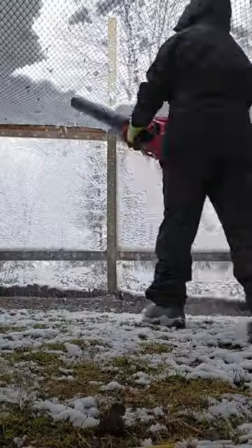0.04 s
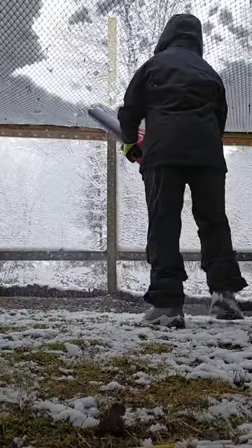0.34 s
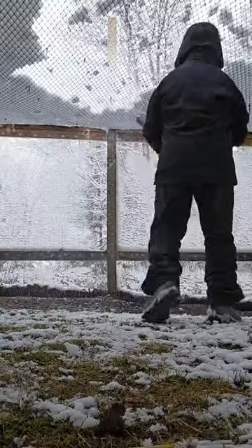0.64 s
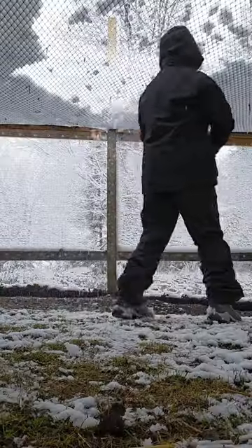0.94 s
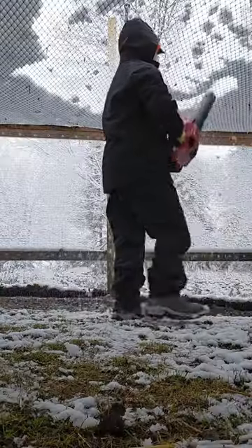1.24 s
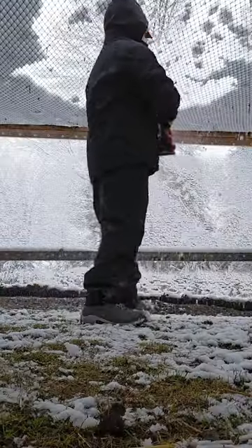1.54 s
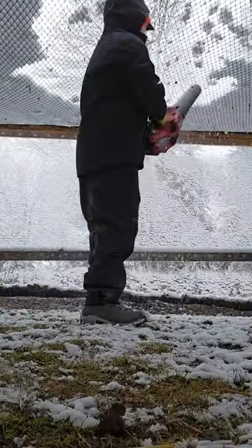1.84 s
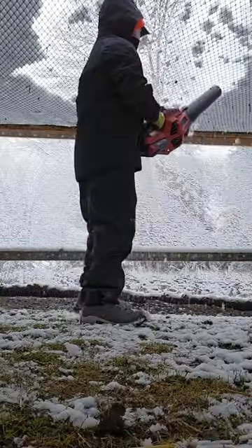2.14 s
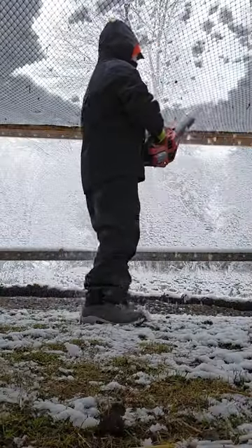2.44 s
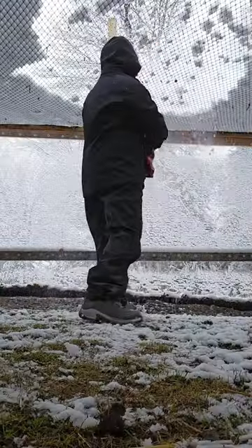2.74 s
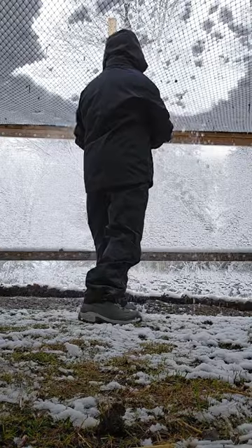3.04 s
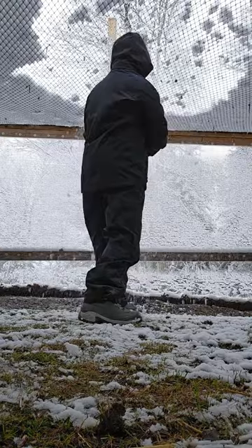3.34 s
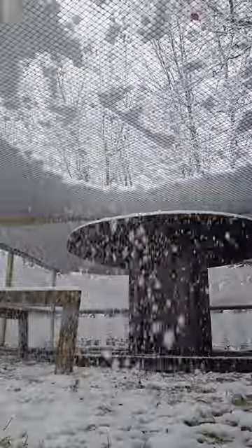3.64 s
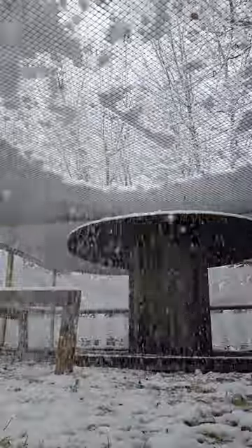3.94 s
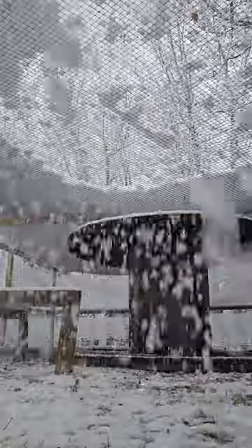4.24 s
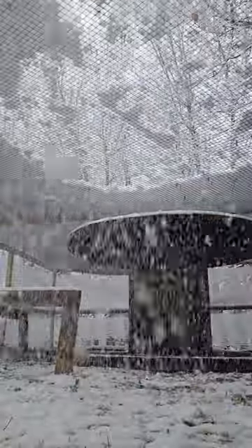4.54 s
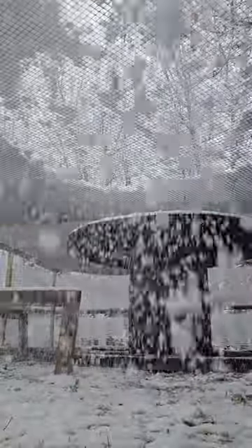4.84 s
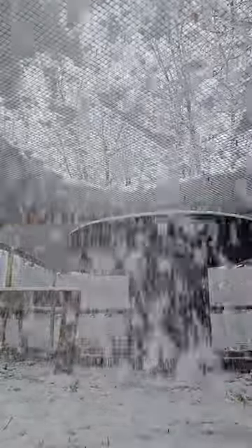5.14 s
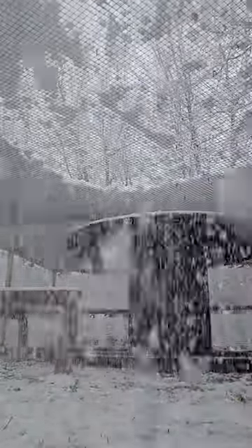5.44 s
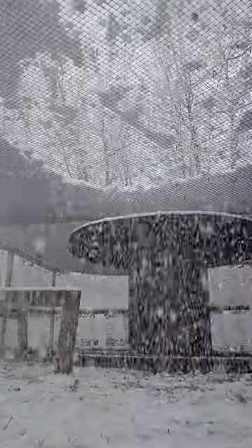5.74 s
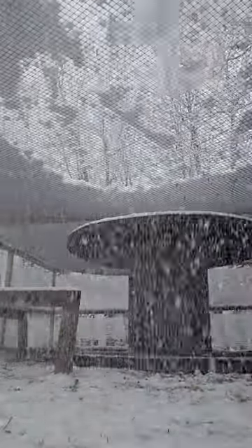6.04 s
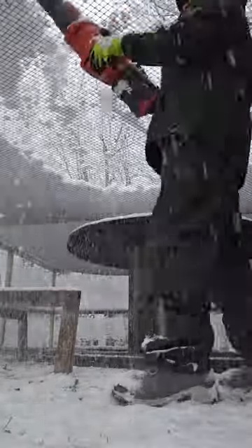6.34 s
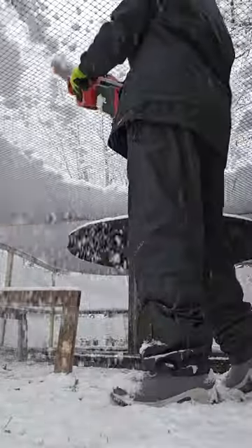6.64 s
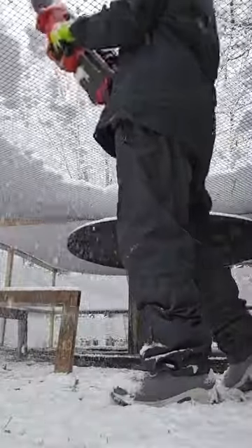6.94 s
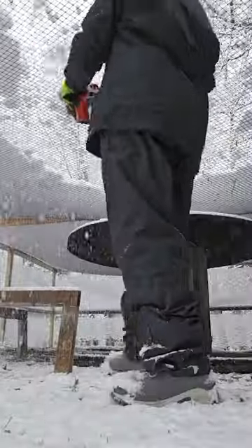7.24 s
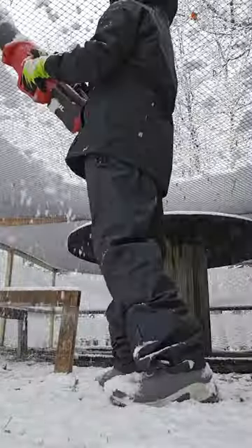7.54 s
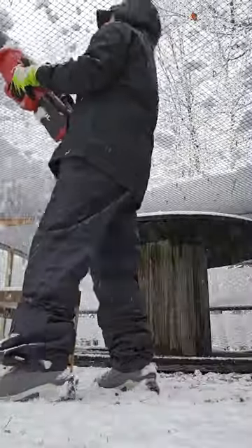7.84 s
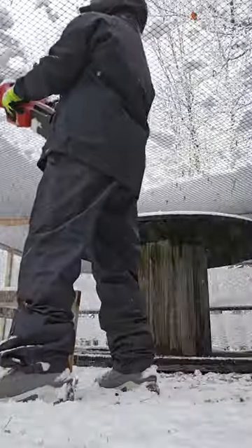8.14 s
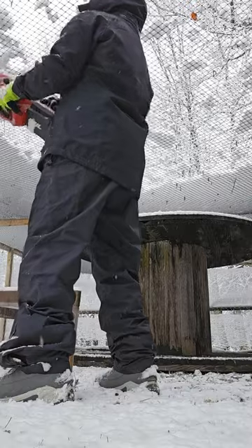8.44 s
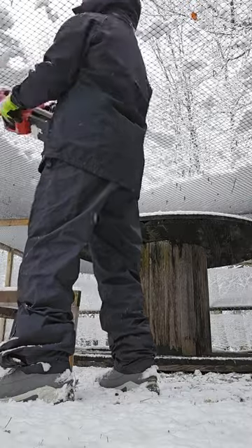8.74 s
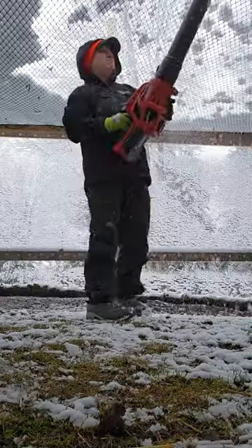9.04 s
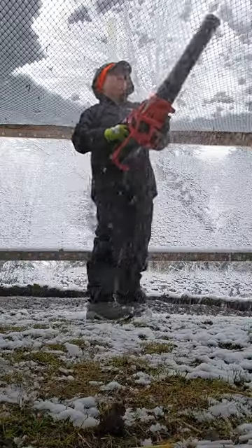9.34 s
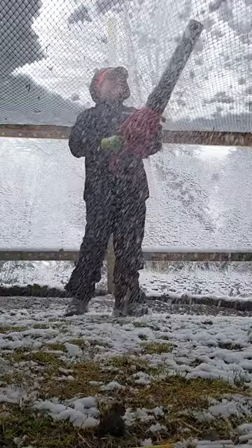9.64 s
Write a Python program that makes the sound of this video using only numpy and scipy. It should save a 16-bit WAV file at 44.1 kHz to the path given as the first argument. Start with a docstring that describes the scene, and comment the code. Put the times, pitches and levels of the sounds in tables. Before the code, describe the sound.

Air rushes and hisses without a break from an electric leaf blower, with a thin, slightly wavering motor whine on top. It starts ahead of the microphone, the hiss surging with each sweep, then jumps to the left, where some snow drops off outdoor netting in muffled puffs. The blower becomes closer and louder there, its whine more prominent, before suddenly sounding thinner and in front again near the end.

```python
"""Leaf blower clearing snow

A cordless blower at full speed blows snow off the netting over an outdoor pen, heard from several
places in turn. Air roars through the tube's resonances and hisses at the nozzle, swelling as it
swings. The fan sings a blade tone with overtones, the motor whines, clumps of snow thud down nearby."""
import sys
import numpy as np
from scipy import signal
from scipy.fft import rfft, irfft, next_fast_len
from scipy.io import wavfile

SR = 44100
rng = np.random.default_rng(int(sys.argv[2]) if len(sys.argv) > 2 else 0)


def unload_wav(signal):
    """Save mono or channel-first audio to the path in sys.argv[1] as 16-bit WAV at rate SR, clipped to [-1, 1]."""
    wavfile.write(
        sys.argv[1],
        SR,
        np.round(np.clip(np.atleast_2d(signal).T, -1, 1) * 32767).astype(np.int16),
    )


N = 432161
TIME = np.arange(N) / SR
CUTOFF_HZ = 16100

# stretch heard from each place: (start [s], end [s])
STRETCHES = [(0, 0.1), (0.1, 3.426), (3.426, 5.375), (5.375, 6.211), (6.211, 8.931), (8.931, 9.8)]
# resting air level per stretch, six zones: (rumble, tube hum, tube roar, intake rush, hiss, spray) [dB]
AIR_REST_DB = [(-34, -34, -36.5, -34, -21.5, -31.5), (-43.5, -37.5, -39, -31, -35.5, -40.5),
               (-41, -48.5, -43.5, -40, -29.5, -37), (-30.5, -35.5, -31.5, -29, -16.5, -30),
               (-36, -35, -31, -32, -22, -36), (-43.5, -44, -43.5, -41, -26, -31)]
# nozzle sweeps towards the listener: (middle [s], length [s], ramp [s], hiss [dB], spray [dB])
NOZZLE_SWEEPS = [(0.13, 0.57, 1, 11.5, 21), (1.29, 0.4, 0.26, 8, 13.5), (2.19, 1.02, 0.7, 12, 20),
                 (3.47, 0.063, 0.06, 2.5, 0), (3.91, 0.48, 0.08, 9, 9), (4.42, 0.11, 0.12, 4.5, 7),
                 (4.93, 0.18, 0.15, 7.5, 8.5), (9.1, 0.39, 0.43, 3, 5)]


def from_db(db):
    """Decibels to gain."""
    return 10 ** (np.asarray(db) / 20)


def rms(x):
    """Root mean square."""
    return np.sqrt(np.mean(x ** 2) + 1e-20)


def in_time(rows, t):
    """Table columns interpolated at times t."""
    times, *columns = np.transpose(rows)
    return np.array([np.interp(t, times, column) for column in columns])


def at_hz(rows, hz):
    """Table columns interpolated over log frequency."""
    knots_hz, *columns = np.transpose(rows)
    return np.array([np.interp(np.log(hz), np.log(knots_hz), column) for column in columns])


def drift(rate_hz, t):
    """Low-passed noise of unit RMS at times t."""
    hop = 40
    pole = np.exp(-2 * hop * np.pi * rate_hz / SR)
    noise = rng.standard_normal(N // hop + 2002)
    slow = signal.lfilter([1], [1, -2 * pole, pole * pole], noise)[2000:]
    return np.interp(t * SR / hop, np.arange(len(slow)), slow / rms(slow))


def swells(rows, t, ramp_s=None):
    """Sum of eased bumps centred within t, per height column; without ramp_s, rows give their ramp."""
    total = 0
    for middle, length, *rest in rows:
        ramp, *heights = rest if ramp_s is None else [ramp_s, *rest]
        share = np.clip(.5 + (length / 2 - np.abs(t - middle)) / ramp, 0, 1)
        share *= t[0] <= middle <= t[-1]
        total = total + np.outer(heights, np.sin(np.pi / 2 * share) ** 2)
    return total


def phase_ahead(hz):
    """Blower ahead: wall echoes turn the phase between the ears."""
    # (frequency [Hz], left lead [rad])
    left_lead = [(680, 0), (1100, 2.9), (1800, 2.4), (2000, .5), (2400, .6), (2700, 3.14), (3700, 3.14),
                 (5500, 4.9), (16000, 9)]
    return at_hz(left_lead, hz)[0]


def phase_side(hz, lag_s=0.0005596, onset_hz=540):
    """Blower to the left: the right channel lags; the low rumble stays centred."""
    return 2 * np.pi * hz * lag_s * hz ** 4 / (hz ** 4 + onset_hz ** 4)


def stereo_noise(hz, size, lead, coherence):
    """Partly coherent white noise spectra at the two ears, left leading."""
    left, independent = rfft(rng.standard_normal((2, size)))
    alike = np.clip(at_hz(coherence, hz)[0], 0, 1)
    right = alike * left + np.sqrt(1 - alike ** 2) * independent
    return np.array([left, right * np.exp(-1j * lead(hz))])


def snow(attack_s=0.0014):
    """Each clump lands as a soft, dull puff."""
    # (time [s], peak [dB], band reference [Hz], decay [s])
    clumps = [(4.085, -24, 220, .02), (4.112, -15, 210, .008), (4.125, -29, 55, .02), (5.125, -32, 60, .03),
              (5.57, -23, 55, .025)]
    out, age = np.zeros(N), np.arange(SR // 2) / SR
    for start_s, peak_db, hz, decay_s in clumps:
        burst = rng.standard_normal(len(age)) * (1 - np.exp(-age / attack_s)) * np.exp(-age / decay_s)
        band = signal.butter(2, [hz / 1.6, hz * 1.07], "band", fs=SR, output="sos")
        puff = signal.sosfilt(band, burst)
        out[round(start_s * SR):][:len(age)] += from_db(peak_db) * puff / np.abs(puff).max()
    return out


def wall_echo(rush, left_lag_s=.0024, sway_s=0.000234, echo_db=-8.0):
    """A near wall returns the hiss; the path sways with the blower, so a faint comb slides."""
    bright = signal.sosfilt(signal.butter(2, 1000, "high", fs=SR, output="sos"), rush)
    lags_s = [left_lag_s * ratio + sway_s * drift(0.396, TIME) for ratio in (1, 1.3)]
    delayed = [np.interp(TIME - lag, TIME, ear) for lag, ear in zip(lags_s, bright)]
    return from_db(echo_db) * np.array(delayed)


def hollow_rush(width_hz=440, trim_db=-2, right_db=-12):
    """Aimed at the netting overhead, the jet rings in one broad band whose pitch follows the aim."""
    # (time [s], centre [Hz], level re hiss before trim [dB])
    band_track = [(3.43, 3830, 5.5), (3.56, 3755, 9.5), (3.75, 3980, -17), (4.08, 3950, -2),
                  (4.35, 3744, -7), (4.6, 3930, -2), (4.86, 4280, -1), (5.01, 3950, 3), (5.25, 4340, 2)]
    start, end = STRETCHES[2]
    now, out = (TIME >= start) & (TIME < end), np.zeros((2, N))
    centre_hz, band_db = in_time(band_track, TIME[now])
    lowpass = signal.butter(2, width_hz / 2, fs=SR, output="sos")
    real, imag = signal.sosfilt(lowpass, rng.standard_normal((2, 2, now.sum())))
    carrier = np.exp(2j * np.pi * np.cumsum(centre_hz) / SR)
    band = np.real((real + 1j * imag) * carrier) * from_db([[0], [right_db]])
    hiss_db = air_levels(TIME[now], AIR_REST_DB[2])[-2]
    out[:, now] = band / rms(band) * from_db(hiss_db + band_db + trim_db)
    return out


def tone(t, hz, level_db, colour, lead, scatter=.42, jitter_rad=0.32):
    """A line roughened by turbulent inflow; echoes on moving paths fade it in each ear separately."""
    pan = from_db(at_hz(colour, hz.mean()))[:, None]
    echoes = np.array([drift(15.0, t) + 1j * drift(6.6, t) for ear in range(2)])
    direct = np.exp(-1j * lead(hz.mean()) * np.array([[0], [1]]))
    phase = 2 * np.pi * np.cumsum(hz) / SR + jitter_rad * drift(94, t)
    line = pan * np.real((direct + scatter * echoes) * np.exp(1j * phase))
    return from_db(level_db) * line / rms(line)


def fan(t, colour, lead, rest_db, spray_db, base_hz=1223, wobble=0.000874, blades=3, whine_order=4.982):
    """Blade tone, overtones and motor whine waver with the shaft and swell as their beams pass."""
    # load eases, shaft speeds up: (middle [s], length [s], rise [Hz])
    surges = [(1.05, 0.45, 8), (1.86, 0.22, 8), (3.15, 0.3, 4), (4.1, 0.28, 7), (5.75, 0.4, 7),
              (6.75, 0.16, 6), (7.13, 0.16, 4), (7.8, 0.4, 3.5), (8.9, 0.36, 6)]
    # blade tone's beam crosses the listener: (middle [s], length [s], gain [dB])
    blade_flares = [(1.14, 0.42, 10.5), (3.08, 0.32, 6.5), (3.53, 0.1, 2), (4.11, 0.24, 16.5),
                    (4.42, 0.31, 12), (4.99, 0.13, 15.5), (5.83, 0.27, 9), (6.44, 0.25, 8.5),
                    (6.73, 0.13, 12.5), (7.12, 0.16, 13.5), (7.34, 0.27, 10), (8.08, 0.24, 9),
                    (8.66, 0.48, 8.5)]
    # motor vents face the listener: (middle [s], length [s], gain [dB])
    whine_flares = [(1.33, 0.09, 12), (5.97, 0.52, 8), (7.57, 0.12, 5), (7.9, 0.13, 10), (8.4, 0.34, 4.5),
                    (8.89, 0.07, 10), (9.39, 0.092, 10), (9.66, 0.3, 4.5)]
    # (blade tone multiple, level re spray [dB])
    overtones = [(3, -10), (4, -10)]
    shaft_hz = (base_hz + swells(surges, t, ramp_s=0.2)[0]) * (1 + wobble * drift(12.0, t))
    blade_hz = blades * shaft_hz
    blade_db, octave_db, whine_db = rest_db
    aim_db = swells(NOZZLE_SWEEPS, t)[0]
    beam_db = swells(blade_flares, t, ramp_s=0.13)[0]
    vent_db = swells(whine_flares, t, ramp_s=0.13)[0]
    lines = [(blade_hz, blade_db + beam_db),
             (2 * blade_hz, octave_db + 1.18 * aim_db),
             (whine_order * shaft_hz, whine_db + 0.94 * aim_db + vent_db)]
    lines += [(multiple * blade_hz, spray_db + db) for multiple, db in overtones]
    return sum(tone(t, hz, db, colour, lead) for hz, db in lines)


def air_levels(t, rest_db):
    """Six zone levels in dB: low zones follow the housing, beamed high ones the nozzle."""
    # housing turns into the open (+) or behind the body (-):
    # (middle [s], length [s], rumble [dB], tube roar [dB], intake rush [dB])
    turns = [(0.39, 0.3, -0.5, 1, 4), (0.83, 0.085, -3, 4, -3), (1.02, 0.2, -3.5, 0.5, -4),
             (1.24, 0.32, -3, -0.5, 1.5), (1.7, 0.31, -5, 0, 0), (2.08, 0.55, -1.5, -3.5, -5.5),
             (2.53, 0.27, -1, 1, 4), (2.81, 0.065, -1, -0.5, 0), (3.15, 0.52, -2, 2, -2.5),
             (3.45, 0.043, 3, 4.5, 7), (3.63, 0.16, -3, 1, -4), (4.01, 0.3, 3, 6, 6),
             (4.96, 0.2, 2, 6.5, 5), (5.5, 0.32, -0.5, 1.5, 1), (6.33, 0.26, 5.5, 1, 0.5),
             (7.0, 0.26, 1.5, 1, 3), (7.28, 0.26, -1.5, -1.5, -3), (7.72, 0.44, 4.5, 2, 0),
             (8.38, 0.24, 5.5, 1.5, 2), (9.27, 0.32, 2, 4.5, 3), (9.68, 0.29, 2.5, -2, 1.5)]
    rumble_db, roar_db, intake_db = swells(turns, t, ramp_s=0.12)
    hum_db = 2.25 * roar_db
    hiss_db, spray_db = swells(NOZZLE_SWEEPS, t)
    return np.array(rest_db)[:, None] + [rumble_db, hum_db, roar_db, intake_db, hiss_db, spray_db]


def air(t, colour, lead, coherence, levels_db):
    """Turbulent air through the tube; roar spreads, hiss is beamed, so each zone swells by itself."""
    # peaks and dips common to all places: low rumble, tube hum, brighter bands of rushing air
    # (centre [Hz], width [Hz], gain [dB])
    peaks = [(82, 50, 3), (239, 54, 6.5), (306, 26, 5.5), (385, 70, -1.5), (490, 66, 12.5), (560, 80, 3.5),
             (825, 125, 6.5), (1230, 200, 4), (2060, 220, 5.5), (2605, 170, -3.5), (3020, 260, 5.5),
             (3920, 650, 1.5), (10426, 860, -9.5), (11500, 1600, 2)]
    # borders of the six zones: (frequency [Hz])
    edges_hz = [340, 630, 1500, 2900, 10500]
    # turbulence per zone, rumble to spray: (relative flutter depth)
    flutter_depths = [0.6, 1, 1.3, 0.97, 0.85, 1.15]
    size = next_fast_len(len(t), True)
    hz = np.maximum(np.fft.rfftfreq(size, 1 / SR), 1)
    peaks_db = sum(db * np.exp(-2 * ((hz - centre) / width) ** 2) for centre, width, db in peaks)
    spectra = stereo_noise(hz, size, lead, coherence) * from_db(at_hz(colour, hz) + peaks_db)
    spectra *= (hz > 20) & (hz < CUTOFF_HZ)
    below = [0] + [1 / (1 + (hz / edge) ** 16) for edge in edges_hz] + [1]
    buffet = drift(15.0, t)  # jet on the netting, common to all zones
    out = 0
    for k, depth in enumerate(flutter_depths):
        zone = irfft(spectra * (below[k + 1] - below[k]), size)[:, :len(t)]
        flutter_db = depth * (0.5 * buffet + 1.24 * drift(23.3, t))
        out = out + zone / rms(zone) * from_db(levels_db[k] + flutter_db)
    return out


def scene(fade_s=.016):
    """The blower from one place after another, with falling snow."""
    # colour at each place: (frequency [Hz], left [dB], right [dB])
    beside = [(25, -37, -38), (287, -27, -26.5), (387, -22.5, -21.5), (630, -13.5, -3.5),
              (1495, -4.5, -10.5), (1550, -9, -16.5), (3570, 3.5, -8), (4080, 0, -21), (4600, 4, -8),
              (6900, 3, -16.5), (7570, 6.5, -12), (8500, -3, -17), (10400, -28.5, -25),
              (15900, -27.5, -34.5)]
    behind_body = [(25, -29, -38), (113, -19, -16.5), (250, -30.5, -28.5), (590, -15.5, -13),
                   (1095, -18.5, -8.5), (1620, -26.5, -43.5), (2245, -8, -10), (2480, -19.5, -22.5),
                   (4330, 6, 5), (7030, -12, -5), (7340, -14, 5.5), (8400, -5, -13.5), (11000, -15, -9.5),
                   (13700, -11.5, -19)]
    off_left = [(25, -18.5, -17), (272, -15.5, -14.5), (480, -27, -18.5), (2000, -18, -23.5),
                (2100, -17.5, -28), (2600, -7, -21), (2950, -12.5, -25), (3740, 2, -13), (5160, -5.5, -19),
                (7800, -4.5, -12.5), (9900, -6.5, -35), (11300, -6.5, -3.5), (15000, 2, -6),
                (15900, -26, -22)]
    close_left = [(25, -14, -14), (250, 0.5, 1.5), (409, -26, -17), (540, -21.5, -13.5), (1330, -7.5, -11),
                  (1710, -14.5, -15), (2450, 0.5, -18), (3080, -4, -22), (4900, 2.5, -13), (5950, -1, -20),
                  (7800, 1.5, -13), (8250, 0.5, -28), (10040, -18, -18), (16200, -37, -35)]
    facing = [(25, -22, -27), (90, -22, -23), (265, -26.5, -25.5), (730, -7, 1), (880, -19, -11),
              (1648, -4.5, -11.5), (2372, -0.5, -6), (5030, 1.5, -1), (6900, -17.5, -7.5),
              (7670, -15, -0.5), (8534, -11.5, -26), (11500, -4.5, 1.5), (14700, 9, -3), (15900, -11, -12)]
    # likeness of the ears, blower ahead or to the left: (frequency [Hz], coherence [0-1])
    ahead_coherence = [(30, .6), (70, .75), (250, .96), (550, .99), (1500, .85), (2100, .93), (2480, .6),
                       (2850, .98), (3350, .97), (4500, .78), (6000, .45), (15000, .5)]
    side_coherence = [(30, .6), (70, .72), (250, .96), (1000, .93), (3000, .76), (8000, .5), (15000, .35)]
    # resting tone levels per stretch: (blade tone [dB], octave [dB], whine [dB])
    tone_rest_db = [(-22, -51, -34), (-37, -55, -50.5), (-37, -41, -39), (-28.5, -27, -30.5),
                    (-33, -29.5, -30), (-35.5, -44, -34)]
    ahead, side = (phase_ahead, ahead_coherence), (phase_side, side_coherence)
    places = [(beside, side), (behind_body, ahead), (off_left, side),
              (close_left, side), (beside, side), (facing, ahead)]
    rush, tones = np.zeros((2, 2, N))
    for (start, end), air_db, tone_db, place in zip(STRETCHES, AIR_REST_DB, tone_rest_db, places):
        colour, (lead, coherence) = place
        share = np.clip(.5 + np.minimum(TIME - start, end - TIME) / fade_s, 0, 1)
        now = share > 0
        t, fade = TIME[now], np.sin(np.pi / 2 * share[now])
        levels_db = air_levels(t, air_db)
        rush[:, now] += fade * air(t, colour, lead, coherence, levels_db)
        tones[:, now] += fade * fan(t, colour, lead, tone_db, spray_db=levels_db[-1])
    return rush + wall_echo(rush) + tones + hollow_rush() + snow()


def record(dry):
    """Steep low-pass."""
    return signal.sosfilt(signal.ellip(12, .1, 80, CUTOFF_HZ, fs=SR, output="sos"), dry)


dry = scene()
out = record(dry)
unload_wav(out)
```